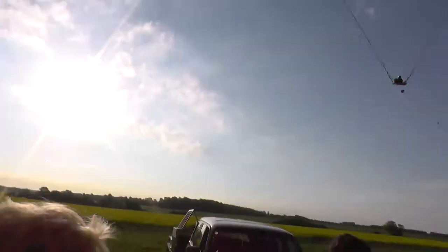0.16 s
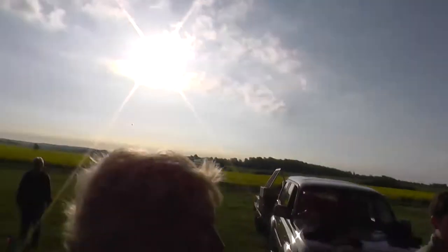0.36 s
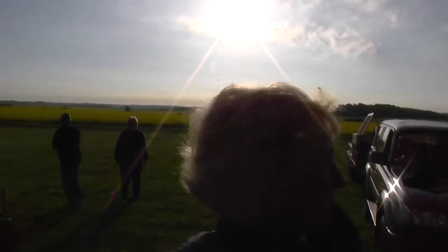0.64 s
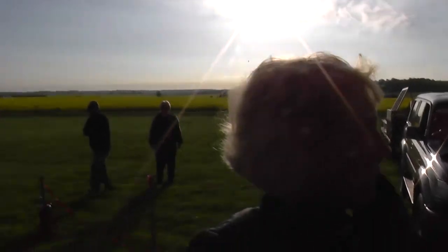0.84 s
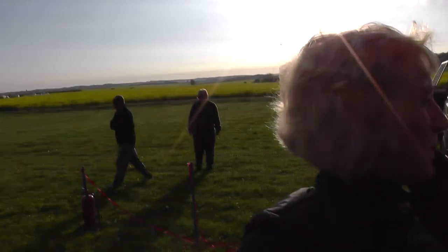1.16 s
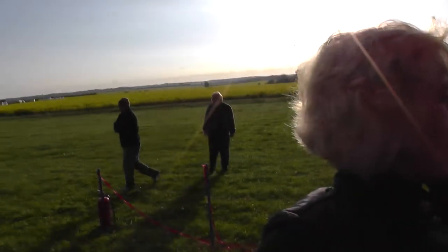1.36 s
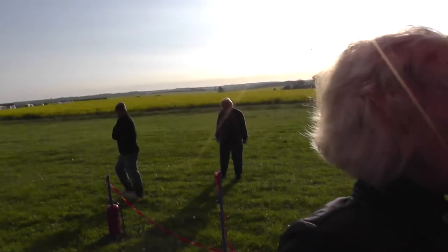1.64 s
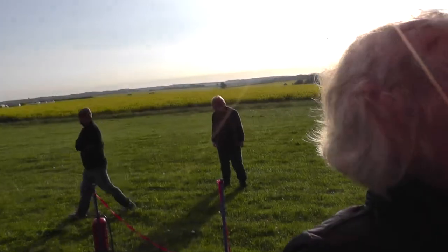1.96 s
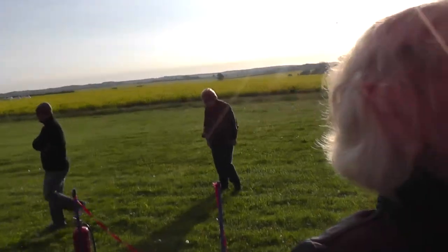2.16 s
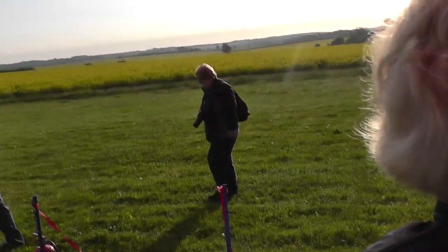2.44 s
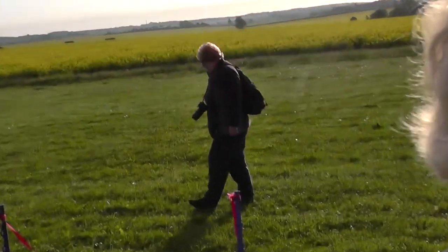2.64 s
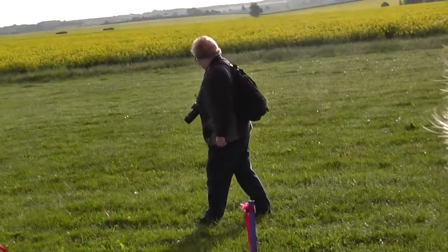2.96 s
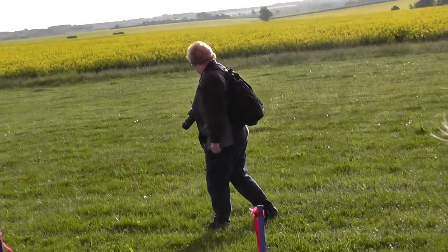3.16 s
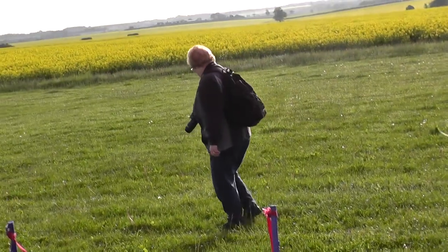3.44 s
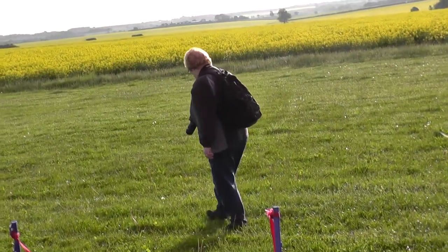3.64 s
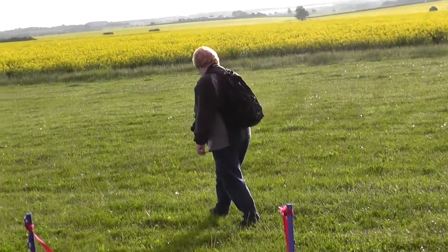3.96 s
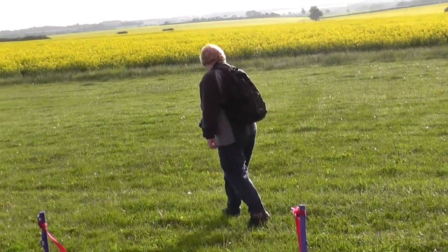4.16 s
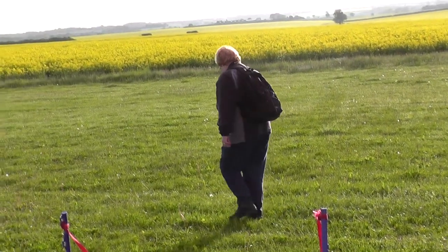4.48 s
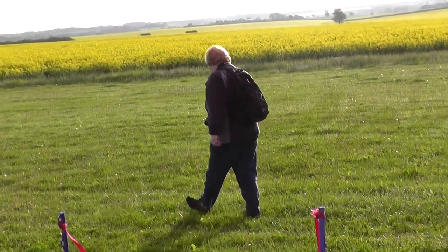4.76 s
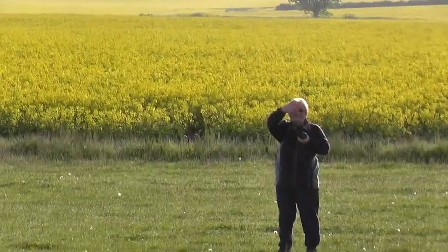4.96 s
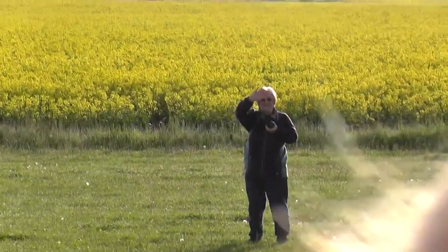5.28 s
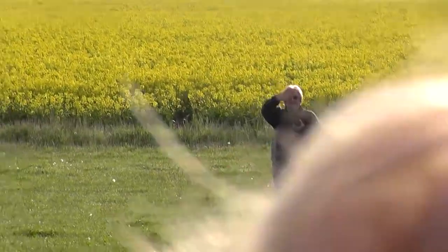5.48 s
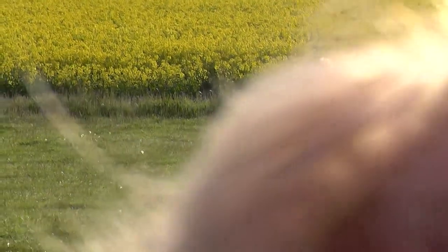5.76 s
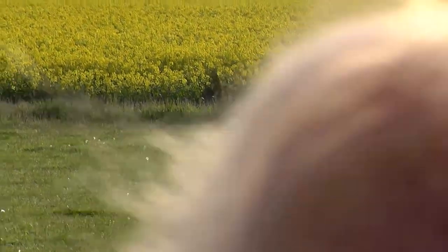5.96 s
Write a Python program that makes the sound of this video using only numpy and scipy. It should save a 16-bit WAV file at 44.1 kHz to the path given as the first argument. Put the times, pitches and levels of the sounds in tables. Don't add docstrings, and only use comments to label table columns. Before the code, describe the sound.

Very close to a propane balloon burner in an open field, a deep, dense flame roar fills everything, with a thinner gas hiss surging about three times a second. The tone shifts as the stereo microphone turns away. After a tiny gap the blast continues slightly darker, then the valve shuts and it collapses almost instantly to a quiet breeze, faint pilot whistle and a few metallic ticks.

```python
import sys
import numpy as np
from scipy import signal
from scipy.io import wavfile
from scipy.ndimage import uniform_filter1d, minimum_filter1d

SR = 44100
rng = np.random.default_rng(int(sys.argv[2]) if len(sys.argv) > 2 else 0)


def invert_db(level):
    return 10 ** (np.asarray(level, dtype=float) / 20)


def dump_mix(stems):
    frames = np.atleast_2d(stems).T
    limited = np.clip(frames, -1, 1)
    pcm = np.round(limited * 32767).astype(np.int16)
    wavfile.write(sys.argv[1], SR, pcm)


N = 269441

# f/Hz, level/dB (per Hz)
FLAME_COLOUR = [
    [(12, -62), (20, -44), (80, -9.5), (172, -1.5), (245, -2), (278, -11), (330, -3), (385, -9.5),
     (426, -5.5), (526, -5), (679, -14.5), (1040, -19), (1280, -29), (1620, -34), (3200, -43),
     (4160, -45.5), (7040, -120)],
    [(12, -75), (20, -43), (44, -21), (81, -10.5), (119, -6.5), (225, -1), (261, -6), (303, -1.5),
     (383, -7.5), (611, -9.5), (805, -19.5), (1340, -28), (1520, -39), (1960, -38), (3200, -50.5),
     (4160, -87), (7040, -120)],
]
# f/Hz, level/dB (per Hz)
FACING_COLOUR = [(12, -70), (20, -52), (60, -10), (150, -3.5), (195, -3.5), (208, -10.5), (233, 0),
                 (293, -4), (420, -2), (503, -9.5), (546, -8), (620, -13), (733, -7.5), (1000, -31),
                 (1300, -56), (2200, -120)]


def flame(part):
    t, hz = part_grid(part)
    notch_hz, depth_db, lean, facing = listener(part, t)
    level_db, treble_db = burn(part, t, facing)
    slide = (NOTCH_HZ[part] / notch_hz) ** np.clip((hz - 700) / 400, 0, 1)
    colour = read(FLAME_COLOUR[part], hz * slide)
    head_on = (1 - part) * np.clip(facing, 0, 1) * np.clip((1000 - hz) / 150, 0, 1)
    colour = colour + head_on * (read(FACING_COLOUR, hz) - 1.5 - colour)
    colour = tilted(colour, hz, treble_db) + echo_notches(hz, notch_hz, depth_db, facing)
    return turbulence(t, hz, colour, level_db, (60, 900), part, lean, patchy_db=0.5, flicker_db=-0.02)


FLAME_DB = [-14.5, -15.5]
HEAD_ON_DB = -1.04
BRIGHT_S, BRIGHT_WIDE_S, BRIGHT_DB = 3.4, 0.65, 0.5
FLAME_SHUT_S, FLAME_KNEE_S, FLAME_DIES_DB_PER_S = 5.658, 0.025, 182
DULL_FROM_DB, DULL_SHARE = 14, 0.31


def burn(part, t, facing):
    lost_db = dying(t, FLAME_SHUT_S, FLAME_KNEE_S, FLAME_DIES_DB_PER_S)
    bright_db = BRIGHT_DB * bump(t, BRIGHT_S, BRIGHT_WIDE_S, BRIGHT_WIDE_S)
    treble_db = bright_db - DULL_SHARE * np.maximum(lost_db - DULL_FROM_DB, 0)
    level_db = FLAME_DB[part] + (1 - part) * HEAD_ON_DB * facing - lost_db
    return level_db, treble_db


def tilted(colour, hz, treble_db):
    change_db = treble_db - np.median(treble_db)
    return colour + 1.8 * change_db * np.clip(np.log2((hz + 1) / 250), 0, 1.5)


def throb():
    wobble = uniform_filter1d(rng.standard_normal(N), size=700)
    return invert_db(0.85 * evened(uniform_filter1d(wobble, size=700)))


LINGER = 0.23
# f/Hz, level/dB (per Hz)
JET_COLOUR = [
    [(1350, -0.5), (2300, -8.5), (3790, -8.5), (4250, -5), (4680, -8), (5200, -5), (6060, -1), (8440, -4),
     (11100, -2.5), (13200, -9.5), (15200, -16.5), (15800, -23)],
    [(1350, -28), (2300, -11), (2620, -12), (3610, -4), (4080, -8), (4350, -8), (4640, -6), (4990, -3.5),
     (5870, 0.5), (6950, -0.5), (7910, -7), (9520, 0), (11200, -1.5), (15100, -13), (15800, -22)],
]


def jet(part):
    t, hz = part_grid(part)
    notch_hz, depth_db, lean, facing = listener(part, t)
    level_db = gas_flow(part, t)
    colour = read(JET_COLOUR[part], hz) + echo_notches(hz, notch_hz, depth_db, facing)
    colour = colour - 1.9 * facing * np.exp(-((hz - 6200) / 1500) ** 2)
    sag_db = np.minimum(level_db - np.median(level_db), 0) * part
    top_loss = 0.9 * np.clip((hz - 11500) / 3500, 0, 1)
    low_spared = LINGER * np.clip((5500 - hz) / 2000, 0, 1)
    colour = colour + sag_db * (top_loss - low_spared)
    return turbulence(t, hz, colour, level_db, (5000, 12000), part, 0.85, patchy_db=0.68, flicker_db=0.58)


JET_DB = [-37.5, -42]
SURGE_RISE_S, SURGE_FALL_S = 0.098, 0.14
SAG_DB_PER_S = 3.5
JET_SHUT_S, JET_KNEE_S, JET_DIES_DB_PER_S = 5.634, 0.03, 165
# t/s, level/dB
SURGES = [(.02, 4.5), (.33, 3.5), (.63, 2.5), (1.06, 4), (1.39, 2.5), (1.71, 3.5), (2.12, 2.5), (2.31, 2),
          (2.48, 2.5), (2.84, 4), (3.18, 4.5), (3.49, 5), (3.83, 4.5), (4.25, 3.5), (4.62, 4), (4.95, .8),
          (5.28, 1.2)]


def gas_flow(part, t):
    surge_db = sum(db * bump(t, s, SURGE_RISE_S, SURGE_FALL_S) for s, db in SURGES)
    sag_db = part * SAG_DB_PER_S * (t - CHANGE[1])
    return JET_DB[part] + surge_db - sag_db - dying(t, JET_SHUT_S, JET_KNEE_S, JET_DIES_DB_PER_S)


def dying(t, shut_s, knee_s, db_per_s):
    return db_per_s * knee_s * np.logaddexp(0, (t - shut_s) / knee_s)


# t/s, peak level/dB, f/Hz, left minus right level/dB
TICKS = [
    (5.8481, -45.5, 6700, 0.5),
    (5.8500, -50, 1900, 0.5),
    (5.925, -54, 9000, -1),
    (6.06, -56, 6000, -3),
]


def ticks():
    out, t = np.zeros((2, N)), np.arange(400) / SR
    for s, peak_db, hz, pan_db in TICKS:
        ring = np.sin(2 * np.pi * hz * t) * invert_db(-60 * t / 0.0084) * (1 - np.exp(-t / 0.0004))
        spit = 1.1 * uniform_filter1d(rng.standard_normal((2, t.size)), size=3) * invert_db(-60 * t / 0.02)
        sides_db = np.array([[peak_db + pan_db / 2], [peak_db - pan_db / 2]])
        at = round(s * SR)
        out[:, at:at + t.size] += (ring + spit) * invert_db(sides_db)
    return out


PILOT_S, PILOT_RISE_S, PILOT_HZ, PILOT_DB = 5.78, 0.05, 1853, -65.5
CATCH_S, CATCH_WIDE_S, CATCH_DB = 5.986, 0.008, -11
GUST_SHARP_HZ = 16


def pilot():
    t = np.arange(N) / SR
    waver = evened(uniform_filter1d(rng.standard_normal(N), size=900))
    hz = PILOT_HZ + GUST_SHARP_HZ * bump(t, GUST_S, 2 * GUST_WIDE_S, 1) + 5 * waver
    rise = np.clip((t - PILOT_S) / PILOT_RISE_S, 0, 1)
    level = rise * invert_db(PILOT_DB + CATCH_DB * bump(t, CATCH_S, CATCH_WIDE_S, CATCH_WIDE_S))
    sides = invert_db(waver + np.array([[-0.4], [0.4]]))
    return np.sqrt(2) * level * sides * np.sin(2 * np.pi * np.cumsum(hz) / SR)


FIELD_DB, CALM_DB = -70.5, 0.5
GUST_S, GUST_WIDE_S, GUST_LIFT_DB, GUST_MIDDLE_DB = 6.083, 0.04, 4, 5
# f/Hz, level/dB (per Hz)
FIELD_COLOUR = [(20, -22), (100, -1), (240, -0.5), (450, -7.5), (820, -8), (1390, -19.5), (2100, -20),
                (2800, -28), (6300, -29), (7800, -34), (10000, -32), (12500, -38), (15800, -54)]
# f/Hz, width f/Hz, level/dB
SHADE = [
    (4600, 280, -6),
    (7800, 450, -7),
]


def field():
    t, hz = part_grid(1)
    gust = bump(t, GUST_S, GUST_WIDE_S, GUST_WIDE_S)
    level_db = FIELD_DB + GUST_LIFT_DB * gust
    middle_db = CALM_DB + GUST_MIDDLE_DB * gust
    colour = read(FIELD_COLOUR, hz) + middle_db * np.exp(-np.log2((hz + 1) / 650) ** 2 / 1.6)
    colour = colour + sum(db * np.exp(-((hz - f_hz) / wide) ** 2) for f_hz, wide, db in SHADE)
    return turbulence(t, hz, colour, level_db, (2500, 6000), 2, 0.9, patchy_db=0.6, flicker_db=0.2)


TURN_S, STILL_FACING = 1.17, [0.028, 0.31]
HEAD_ON_NOTCH_HZ = 1220
ECHO_DB, ECHO_REST_DB, ECHO_FADE_S, LATE_ECHO_DB = 8, 2, 0.55, 4.5
LEAN_REST, LEAN_HEAD_ON, LEAN_NARROW = [0.74, 1], 0.8, 4.6
NOTCH_HZ = [1620, 1450]


def listener(part, t):
    if part:
        return NOTCH_HZ[1] + 0 * t, LATE_ECHO_DB, LEAN_REST[1], STILL_FACING[1]
    angle = np.pi / 2 * np.clip(t / TURN_S, 0, 1)
    away, toward = np.sin(angle), np.maximum(np.cos(angle), 0)
    notch_hz = HEAD_ON_NOTCH_HZ + (NOTCH_HZ[0] - HEAD_ON_NOTCH_HZ) * away
    settle = np.exp(-(np.maximum(t - 0.65 * TURN_S, 0) / ECHO_FADE_S))
    depth_db = away * (ECHO_REST_DB + (ECHO_DB - ECHO_REST_DB) * settle)
    lean = LEAN_REST[0] + LEAN_HEAD_ON * toward ** LEAN_NARROW
    return notch_hz, depth_db, lean, np.maximum(toward, STILL_FACING[0])


def echo_notches(hz, notch_hz, depth_db, facing):
    first = -np.exp(-((hz - notch_hz) / 75) ** 2)
    ridge = 0.66 * np.exp(-((hz - 1.35 * notch_hz) / 130) ** 2)
    second = -1.5 * facing * np.exp(-((hz - 1.72 * notch_hz) / 280) ** 2)
    return depth_db * (first + ridge + second)


HOP, SIZE = 512, 2048
# f/Hz, level/dB
LEAN = [
    [(60, 7), (110, -1.5), (200, -1), (380, -1.5), (700, -4.5), (1290, -5.5), (2380, -8), (4400, -2),
     (8120, 1.5), (15000, -6.5)],
    [(60, -0.5), (110, -1), (200, 0.5), (380, -3), (700, -3.5), (1290, -4), (2380, -5), (4400, -4),
     (8120, 2.5), (15000, -7)],
    [(60, -0.5), (180, 0.5), (550, 0.0), (1650, -0.5), (4970, -0.5), (15000, -0.5)],
]
# f/Hz, phase/rad
LEAD = [
    [(60, -.07), (150, -.15), (300, -.33), (700, -.5), (1000, -.25), (1600, -.75), (2100, .1), (3200, -.45),
     (7200, -.2), (8600, -3.1), (10300, -3.1), (12200, -7), (15000, -6.4)],
    [(60, -.07), (150, -.15), (300, -.35), (1000, -.6), (1400, -1), (1750, -3.6), (2250, -6.4),
     (4800, -6.2), (7000, -6.4), (8400, -3.5), (11200, -5.6), (15000, -6.1)],
    [(60, 0), (15000, 0)],
]
# f/Hz, likeness (0 to 1)
SAME = [
    [(30, 0.77), (70, 1), (500, 0.96), (1000, 0.98), (1800, 0.49), (3000, 0.66), (4200, 0.31), (6500, 0.72),
     (7800, 0.15), (9500, 0.061), (15000, 0.2)],
    [(30, 0.93), (70, 0.99), (500, 1), (1200, 0.97), (1600, 0.31), (2100, 0.93), (3000, 0.23), (5000, 0.64),
     (7500, .15), (9000, .45), (15000, .3)],
    [(30, 0.99), (200, 0.99), (1000, 0.97), (1500, 0.77), (3000, 0.86), (5000, 0.64), (8000, .25),
     (15000, .25)],
]


def turbulence(t, hz, colour_db, level_db, band, ports, lean, patchy_db, flicker_db):
    a, b, c, d, eddies = rng.standard_normal((t.size, hz.size, 5)).T
    eddies = evened(uniform_filter1d(uniform_filter1d(eddies, size=28, axis=0), size=5, axis=1))
    flicker = evened(uniform_filter1d(rng.standard_normal(t.shape), size=2, axis=1))
    same = np.clip(read(SAME[ports], hz), 0, 1)
    source = a + 1j * b
    left = source * np.exp(1j * read(LEAD[ports], hz))
    right = same * source + np.sqrt(1 - same ** 2) * (c + 1j * d)
    tip = invert_db(lean * read(LEAN[ports], hz) / 2)
    inside = (hz > band[0]) & (hz < band[1])
    shape = invert_db(colour_db) / np.sqrt((invert_db(2 * colour_db) * inside).sum(0))
    level = invert_db(level_db + patchy_db * eddies + flicker_db * flicker)
    spectra = np.array([left * tip, right / tip]) * shape * level
    sound = invert_db(2.0) * signal.istft(spectra, nperseg=SIZE, noverlap=SIZE - HOP)[1]
    return np.pad(sound, ((0, 0), (round(t[0, 0] * SR), N)))[:, :N]


def evened(x):
    return x / np.sqrt(np.mean(x ** 2) + 1e-20)


def read(points, hz):
    f, value = np.transpose(points)
    return np.interp(np.log(hz + 1), np.log(f + 1), value)


def bump(t, centre_s, rise_s, fall_s):
    return np.exp(-((t - centre_s) / np.where(t < centre_s, rise_s, fall_s)) ** 2)


# t/s, t/s
CHANGE = (4.85068, 4.85600)


def part_grid(part):
    start, end = (CHANGE[0], N / SR) if part else (0, CHANGE[0])
    frames = np.arange(int(start * SR) // HOP, int(end * SR) // HOP + 5)
    return (frames * HOP / SR)[None], np.fft.rfftfreq(SIZE, 1 / SR)[:, None]


def steepened(x):
    return x + 0.082 * x ** 2


def scene():
    t = np.arange(N) / SR
    unsteady = throb()
    first = steepened(unsteady * flame(0) + jet(0))
    second = steepened(unsteady * flame(1) + jet(1) + ticks() + pilot() + field())
    fade_out = np.clip((CHANGE[0] - t) / 0.00012, 0, 1)
    fade_in = np.clip((t - CHANGE[1]) / 0.0004, 0, 1)
    low_cut = signal.butter(2, 55, "highpass", fs=SR)
    return signal.lfilter(*low_cut, first) * fade_out + signal.lfilter(*low_cut, second) * fade_in


def roll_off(x):
    return signal.sosfilt(signal.butter(12, 15990, fs=SR, output="sos"), x)


def record(dry):
    room_left = np.minimum(0.84 / (abs(dry).max(0) + 1e-9), 1)
    gain = uniform_filter1d(minimum_filter1d(room_left, size=401), size=401)
    edge = signal.firwin(1023, 15730, window=("kaiser", 9), fs=SR)
    mix = signal.oaconvolve(dry * gain, edge[None], "same")
    return roll_off(mix)


dry = scene()
out = record(dry)
dump_mix(out)
```